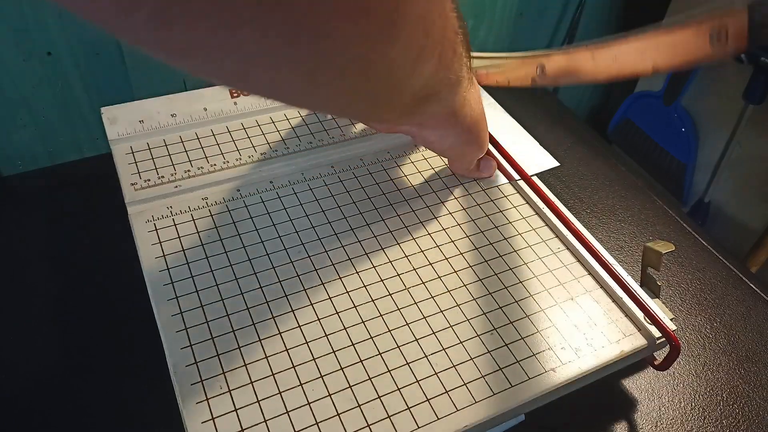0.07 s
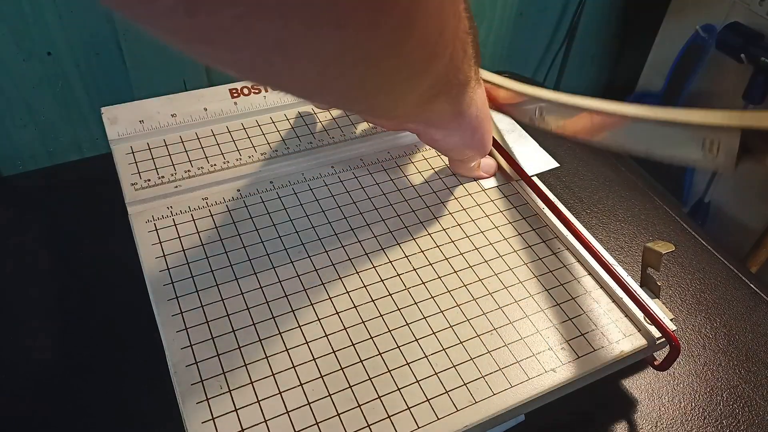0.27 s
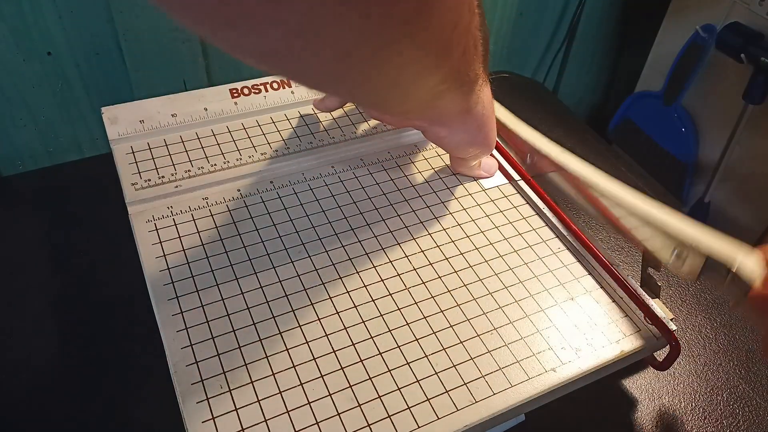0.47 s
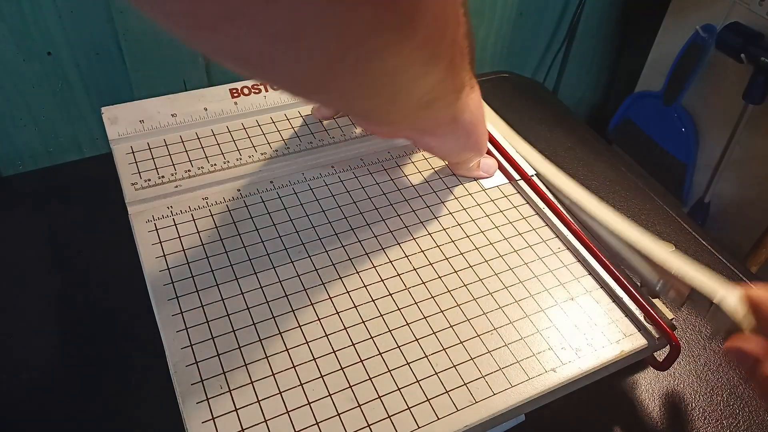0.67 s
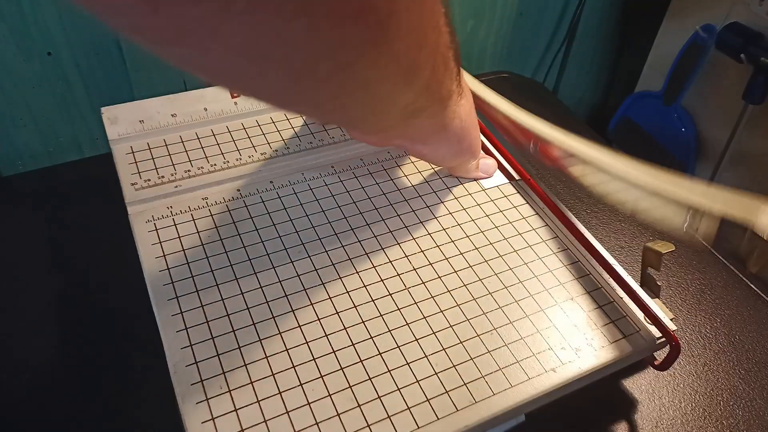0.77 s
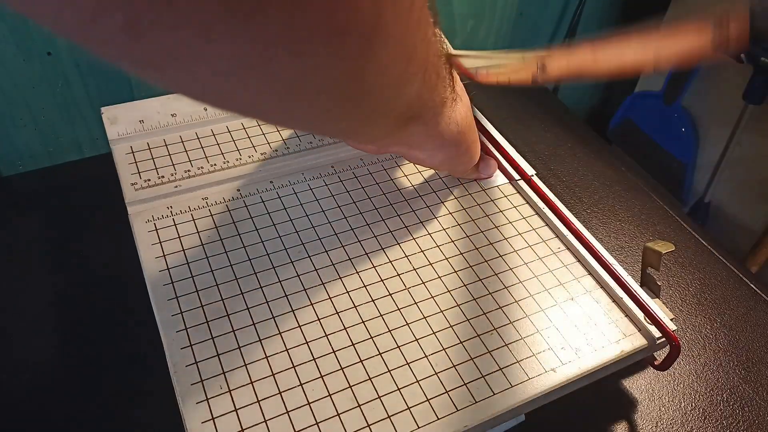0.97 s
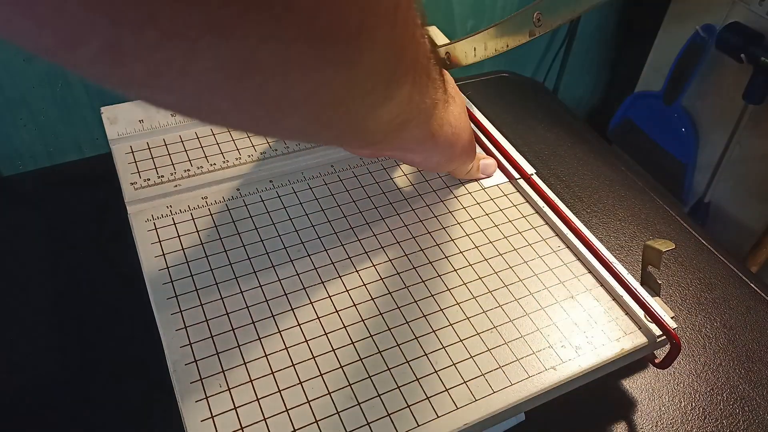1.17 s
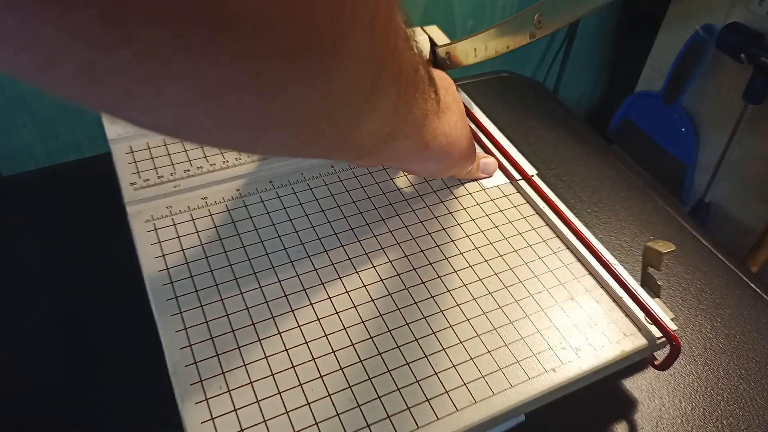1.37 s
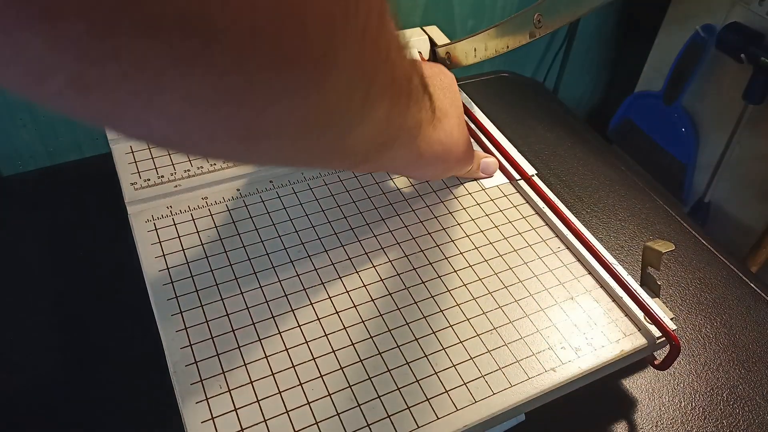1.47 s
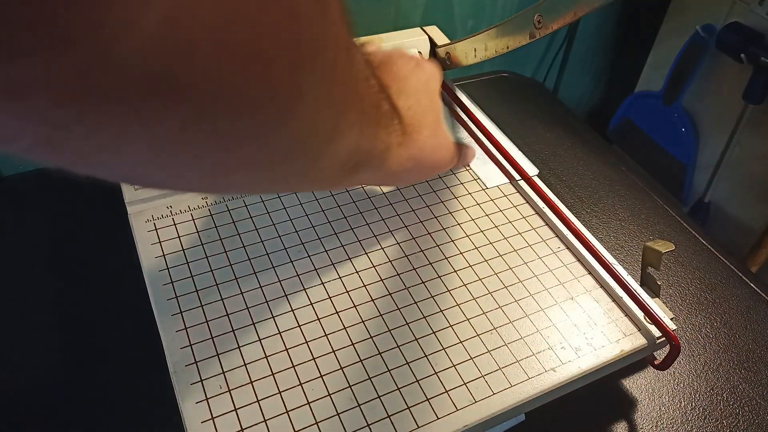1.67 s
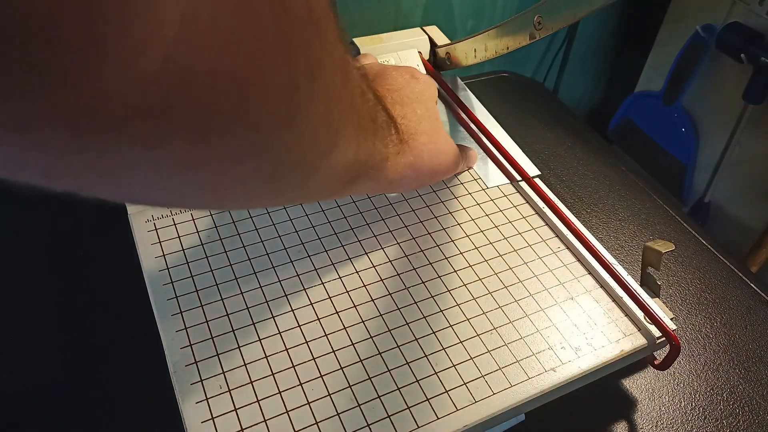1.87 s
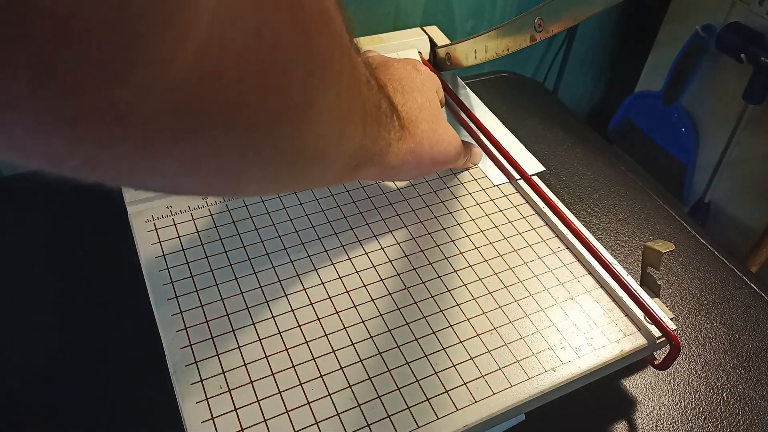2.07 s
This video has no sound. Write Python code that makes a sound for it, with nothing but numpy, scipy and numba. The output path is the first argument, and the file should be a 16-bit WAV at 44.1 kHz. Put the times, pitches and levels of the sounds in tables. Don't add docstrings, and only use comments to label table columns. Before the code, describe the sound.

A lever paper cutter grinds loudly through thin metal sheet, scrapes back up and knocks at its stop

```python
import sys
import numpy as np
from scipy import signal
from scipy.fft import rfft, irfft
from scipy.io import wavfile
from scipy.ndimage import uniform_filter1d
from numba import njit

SR = 44100
rng = np.random.default_rng(int(sys.argv[2]) if len(sys.argv) > 2 else 0)


def pcm_store(signal):
    levels = np.round(np.clip(np.atleast_2d(signal), -1, 1) * 32767)
    wavfile.write(sys.argv[1], SR, levels.astype(np.int16).T)


def boost_factor(decibels):
    exponent = np.asarray(decibels, float) / 20
    return 10 ** exponent


N = 92610

# [f/Hz, level/dB, t60/s]
BOARD = [(93.487, -8.5, 0.53), (132.82, -13, 0.7), (147.18, -1, 0.4061), (199.38, -2.5, 0.11),
         (226.77, 1.5, 0.16472), (275.29, -12.5, 0.14)]
ARM = [(444, 0.5, 0.3329, 8, 0.1732), (482.5, -4.5, 0.2763, -4.5, 0.3557),
       (556.5, -5, 0.3278, -0.5, 1.1367), (677, -13, 0.1983, -1.5, 0.5666),
       (874.5, -9.5, 0.0356, -15.5, 2.5), (880, -17, 0.074), (1295, -9, 0.11), (1440, -15, 0.088),
       (1610, -4.9, 0.057), (2013, -0.57, 0.022), (2200, -7.5, 0.08), (4100, -6, 0.11)]
AIR_HZ = 11854
PATCHY_DB = 3.5
SIDES = np.array([[1], [-1]])


def level(x, db=0):
    return x * boost_factor(db) / np.sqrt(np.mean(x ** 2))


@njit
def svf(x, hz, k):
    y, b, l = np.empty(len(x)), 0., 0.
    for i in range(len(x)):
        g = np.tan(np.pi * hz[i] / SR)
        v = (b + g * (x[i] - l)) / (1 + g * (g + k))
        b, l, y[i] = 2 * v - b, l + 2 * g * v, k * v
    return y


def band(x, hz, width_hz):
    return svf(x, np.full(len(x), 1. * hz), width_hz / hz)


def twice(x, hz, width_hz, hz2, width2_hz):
    return band(band(x, hz, width_hz), hz2, width2_hz)


def ring(x, modes):
    out = 0
    for k, (hz, db, t60, *place) in enumerate(modes):
        usual = (-.6, .12) if hz < 400 else (0, 1.625 * (-1) ** k)
        pan_db, lead = place or usual
        r = np.exp(-np.log(1000) / (t60 * SR))
        pole = r * np.exp(2j * np.pi * hz / SR)
        z = signal.lfilter([np.sqrt(2 * (1 - r * r))], [1, -pole], x) * boost_factor(db)
        out = out + np.array([(z * np.exp(.5j * s * lead)).imag * boost_factor(s * pan_db / 2) for s in (1, -1)])
    return out


def total_gain(modes):
    return np.sqrt(np.sum(boost_factor([m[1] for m in modes]) ** 2))


def walk(rate):
    k = int(SR / rate)
    steps = np.repeat(rng.standard_normal(N // k + 1), k)
    return 1.743 * uniform_filter1d(uniform_filter1d(steps, k), k)[:N]


def grit():
    slips_per_s, spread_db = 14000, 2.0
    chance, size = rng.random((2, N))
    slips = (chance < slips_per_s / SR) * boost_factor(-spread_db * np.log(size + 1e-9))
    return level(slips * rng.standard_normal(N) + 0.05 * rng.standard_normal(N))


def hump(t, start, length, rise, fall):
    return np.clip((t - start) / rise, 0, 1) * np.exp(-np.maximum(t - start - length, 0) / fall)


def spread(mid, side):
    return mid + .6 * side * SIDES


def shop():
    # [f/Hz, level/dB]
    spectrum = [(60, -12), (240, -9.5), (400, -25), (3500, -32), (7000, -31.5), (11000, -51.5)]
    hz, db = np.transpose(spectrum)
    f = np.arange(N // 2 + 1) * SR / N + 1
    gain = boost_factor(np.interp(np.log(f), np.log(hz), db))
    x = irfft(rfft(rng.standard_normal((2, N))) * gain, N)
    return level(x + 0.7 * x[::-1], -69.5) * boost_factor(2.0 * walk(9.6))


def strokes(t):
    # [t/s, load on the board/dB, chatter/dB, chatter f/Hz, edge scrape/dB]
    down = [
        (0.134, -93, -58.5, 1570, -58.5),
        (0.17, -35, -40, 1132, -49),
        (0.223, -30, -37.5, 1281, -47.5),
        (0.349, -28, -31, 1270, -41.5),
        (0.449, -22, -26.5, 1074, -35.5),
        (.585, -20.5, -18, 1072, -31.5),
        (0.649, -21, -28.5, 905.4, -27),
        (0.749, -29.5, -42, 850, -28.5),
        (0.806, -50, -37, 1254, -33),
    ]
    up = [
        (0.83, -34.5, -25, 3257, -28.5),
        (0.867, -37, -24.5, 2467, -27),
        (0.894, -28, -22, 1402, -31.5),
        (0.931, -31, -25, 1204, -29),
        (1.04, -32.5, -27.5, 1600, -33.5),
        (1.121, -30.5, -31.5, 1379, -28.5),
        (1.143, -24.5, -44, 799.9, -34.5),
        (1.167, -29, -47, 980, -30.5),
        (1.201, -36.5, -40.5, 1183, -37),
    ]
    # [t/s, level/dB, length/s]
    catches = [
        (0.143, -46, 0.0107),
        (0.628, -19.5, 0.0055),
        (0.676, -33, 0.024),
        (1.129, -34, 0.0039),
        (1.183, -26.5, 0.0087),
    ]
    when, load_db, chatter_db, chatter_hz, scrape_db = np.array(down + up).T
    release = np.exp(-np.maximum(t - when[-1], 0) / .006)
    judder = boost_factor(1.5 * walk(45))
    on = release * judder * np.clip(t / when[0], 0, 1) ** 2
    load, chatter, push = [boost_factor(np.interp(t, when, db)) * on for db in (load_db, chatter_db, scrape_db)]
    for start, db, length in catches:
        push = push + boost_factor(db) * hump(t, start, length, 0.0017, 0.0011)
    pitch = np.exp(np.interp(t, when, np.log(chatter_hz)))
    return load, chatter, pitch, push


def board_groan(t, load):
    # [t/s, favoured f/Hz]
    bearing = [
        (.2, 213),
        (.45, 159),
        (.62, 182.2),
        (.72, 92.9),
        (.82, 230),
        (1.2, 210),
    ]
    hz = np.interp(t, *np.transpose(bearing))
    shake = svf(svf(grit(), hz, 1.7), hz, 1.7) * load
    pressed = .45
    return ring(shake, [(hz, db, pressed * t60) for hz, db, t60 in BOARD]) / total_gain(BOARD)


def arm_chatter(force, pitch):
    wide = 0.69916
    slips = grit()
    narrow = svf(svf(slips, pitch, wide), pitch, wide)
    rough = np.array([twice(grit() * force, 1500, 2100, 1500, 2500) for _ in range(2)])
    arm = ring((narrow + boost_factor(-9) * slips) * force, ARM)
    return arm + boost_factor(4.5) * (rough + 0.4 * rough[::-1]) + boost_factor(2.5) * narrow * force


def edge_scrape(push):
    # [f/Hz, level/dB]
    edge_modes = [(3680, -9.5), (5320, 1), (5870, 3.5), (6360, 6), (6700, 4.5), (7050, 1), (7500, -2),
                  (8260, -13)]
    rub = grit() * push
    edge = 0
    for hz, db in edge_modes:
        bursts = boost_factor(3 * walk(39))
        edge = edge + ring(rub * bursts, [(hz, db, 0.014, .2, 1.2)])
    air_rise = 1.2
    bright = push * (push / boost_factor(-30)) ** (air_rise - 1) * boost_factor(PATCHY_DB * walk(25))
    mid, side = [twice(grit() * bright, AIR_HZ, 7000, AIR_HZ, 9000) for _ in range(2)]
    return edge / total_gain(edge_modes) + boost_factor(-30) * (mid + .4 * side * SIDES)


def sheet(x):
    # [f/Hz, level/dB]
    outline = [(700, -4.5), (2000, -6), (3500, -4), (6500, -4.5), (8000, -4), (10000, -16), (15800, -21)]
    outline_hz, outline_db = np.transpose(outline)
    low, high = outline_hz[0], outline_hz[-1]
    c = rng.random((48, 4))
    hz = low + (high - low) * ((np.arange(48) + c[:, 0]) / 48) ** 1.3
    db = np.interp(np.log(hz), np.log(outline_hz), outline_db) + 6 * c[:, 1] - 17
    t60 = np.full(48, 0.030643)
    pan_db = 3 * (c[:, 2] - .5)
    lead = 4 * 1.3491 * (c[:, 3] - .5) * np.minimum(4500 / hz, 1)
    modes = np.array([hz, db, t60, pan_db, lead]).T
    return sum(ring(x * boost_factor(PATCHY_DB * walk(21.685)), group) for group in modes.reshape(12, -1, 5))


def locks(t):
    # [t/s, length/s, level/dB, f/Hz, left-right/dB]
    lock_events = [(.21, 0.02914, -29, 230, 3.5), (0.211, 0.09967, -36, 440.6, 4),
                   (0.306, 0.08324, -37, 560, -0.5), (0.346, 0.09433, -32, 435, 5),
                   (0.366, 0.10003, -23, 150, -0.5), (0.403, 0.04718, -28, 240.6, 0),
                   (0.489, 0.0427, -18.5, 158, 0), (0.491, 0.03756, -21.5, 229.1, 0),
                   (0.552, 0.019, -22, 233.1, 0), (0.546, 0.08283, -25.5, 438.9, 5),
                   (0.598, 0.03231, -24, 189.6, -0.5), (0.653, .055, -26, 222, 1.5),
                   (0.712, 0.03432, -28, 140.3, 0), (0.729, 0.02497, -37.5, 677.4, -3),
                   (.815, 0.06138, -33.5, 230, 0.5), (.878, 0.01219, -26, 573, -1.5),
                   (.912, 0.04405, -18, 445, 7.5), (0.952, 0.0077, -15.5, 455, 5),
                   (0.971, 0.02103, -15, 440, 4), (1.01, 0.02412, -18.5, 448, 5.5),
                   (1.037, 0.022, -21.5, 482.4, 0.5), (1.092, 0.04378, -31, 558.9, -1),
                   (.95, .07, -26, 540.5, -2.5), (0.956, 0.04988, -27, 231.5, 1.5),
                   (1.053, 0.016, -21.5, 224.4, -1), (1.089, 0.05076, -28, 219, -1)]
    out = 0
    for start, length, db, hz, pan_db in lock_events:
        wobble = 1 + 0.025059 * walk(40)
        phase = 2 * np.pi * np.cumsum(hz * wobble) / SR
        size = np.sqrt(2) * boost_factor(db + 1.5 * walk(90)) * hump(t, start, length, .006, 0.012056)
        lead = .35 * hz / 900
        out = out + size * np.array([np.sin(phase + k * lead) * boost_factor(k * pan_db / 2) for k in (1, -1)])
    return out


def knocks(t):
    # [t/s, board/dB, arm/dB, crack/dB, contact/s]
    knock_events = [
        (0.214, -32, -22, -64.5, 0.002685),
        (1.224, -39, -22, -27, 0.00045805),
        (1.2286, -22.5, -18, -46.5, 0.0010332),
        (1.2369, -13.5, -68.5, -62.5, 0.000922),
        (1.274, -18, -11.5, -70.5, 0.0022237),
        (1.294, -16.5, -63.5, -83, 0.003994),
        (1.387, -39, -32, -44.5, 0.00075),
        (1.39, -7.5, -14.5, -27.5, 0.001969),
        (1.413, -24.5, -13.5, -32, 0.00231),
    ]
    board, arm, rattle, thud = np.zeros((4, N))
    for start, board_db, arm_db, crack_db, contact in knock_events:
        push = np.sin(np.pi * np.clip((t - start) / contact, 0, 1)) / (contact * SR)
        board += 25 * boost_factor(board_db) * push
        arm += 40 * boost_factor(arm_db) * push
        rattle += boost_factor(crack_db) * hump(t, start, 0, 0.0016, 0.08437 / np.log(1000))
        thud += boost_factor(crack_db + 9.5) * hump(t, start, 0, 0.00089, 0.0925 / np.log(1000))
    noise = np.array([twice(grit() * rattle, 3000, 6100, 2200, 9000)
                      + 3 * twice(grit() * thud, 700, 550, 700, 810) for _ in range(2)])
    held = 0.3575
    resting_arm = [(m[0], m[1], held * m[2]) for m in ARM[1:]]
    return ring(board + 0.39 * grit() * thud, BOARD) + ring(arm, resting_arm) + noise + .5 * noise[::-1]


def rubs(t, rows, attack):
    fall = 0.014
    out = np.zeros((2, N))
    for start, length, db, hz, width_hz in rows:
        i = slice(int(start * SR), int((start + length + 8 * fall) * SR))
        shape = (boost_factor(db + 1.3 * walk(120)) * hump(t, start, length, attack, fall))[i]
        wide = 1.3 * width_hz
        for k in range(2):
            noise = rng.standard_normal(len(shape))
            body = level(twice(noise, hz, wide, hz, wide))
            air = level(band(noise[::-1].copy(), AIR_HZ, 9100))
            out[k, i] += shape * (body + boost_factor(-9.5) * width_hz / 5000 * air)
    return out


def squeals(t):
    # [t/s, length/s, level/dB, centre f/Hz, width/Hz]
    squeal_events = [(0.558, 0.018, -24, 4381, 210), (0.71, 0.024, -23.5, 6890, 400),
                     (0.741, 0.035, -31.5, 6816, 290), (0.75, 0.016, -26.5, 3455, 390),
                     (1.4, 0.0053, -33, 5040, 300), (0.79, 0.025, -25.5, 885, 79),
                     (0.91, 0.11, -28, 2300, 250), (0.58, 0.011, -26.5, 4250, 250),
                     (.95, .015, -28, 2000, 200), (0.88, 0.044, -36, 2500, 69),
                     (.885, 0.033, -28.5, 1600, 210), (0.59, .05, -33.5, 1580, 140),
                     (0.44, 0.079, -34, 1600, 130), (0.5, 0.03, -31.5, 1950, 200),
                     (.385, .012, -33, 1300, 72.1), (0.52, 0.078, -27, 870, 120)]
    return boost_factor(-3) * spread(*rubs(t, squeal_events, 0.01))


def hand(t):
    # [t/s, length/s, level/dB, centre f/Hz, width/Hz]
    slides = [
        (1.333, 0.06138, -62.5, 4500, 5000),
        (1.506, 0.10718, -58, 6827, 6980),
        (1.762, .018, -58, 3000, 3996),
    ]
    scuffs = [(1.679, 0.0138, -74, 1466, 500), (1.683, 0.003, -70.5, 5000, 5000),
              (1.785, 0.009162, -47.5, 1459, 483), (1.781, 0.0014, -44.5, 5659, 4075),
              (1.794, 0.005696, -31, 5600, 5991), (1.796, 0.031, -49, 1305, 800),
              (1.808, 0.011, -36, 6326, 6024), (1.815, 0.0311, -57.5, 226, 150),
              (1.925, 0.036, -61.5, 5682, 5000), (1.976, .006, -53, 4459, 4010),
              (1.983, 0.010815, -44.5, 5176, 4060), (2.007, 0.006527, -49, 3221, 183),
              (2.008, 0.006, -50.5, 3995, 250.6), (1.987, 0.026044, -53.5, 5907, 3000),
              (2.063, 0.002883, -47, 1849, 997), (2.069, 0.02676, -57.5, 4584, 5000),
              (2.046, 0.04918, -63.5, 201.1, 120)]
    return rubs(t, scuffs, 0.0021) + rubs(t, slides, 0.032)


def room(near):
    lag = np.arange(SR // 2) / SR
    decay = boost_factor(-60 * lag / 0.146) * np.clip(lag / 0.0029, 0, 1)
    tail = rng.standard_normal((2, len(lag))) * decay
    tail = signal.lfilter(*signal.butter(1, [300, 5000], "band", fs=SR), tail)
    tail = tail / np.sqrt(np.sum(tail ** 2) / 2)
    return boost_factor(-13.5) * signal.fftconvolve(near.mean(0, keepdims=True), tail, axes=1)[:, :N]


def scene():
    t = np.arange(N) / SR
    load, chatter, pitch, push = strokes(t)
    cut = board_groan(t, load) + arm_chatter(chatter, pitch) + edge_scrape(push)
    mid, side = hand(t)
    steel = sheet(boost_factor(0.5) * grit() * push + boost_factor(-4) * mid)
    near = cut + steel + locks(t) + knocks(t) + squeals(t) + boost_factor(-3) * spread(mid, side)
    return near + room(near) + shop()


def low_pass(x):
    return signal.sosfilt(signal.butter(12, 15900, fs=SR, output="sos"), x)


def record(dry):
    # [t/s, gain/dB]
    gate_moves = [
        (1.652, -2),
        (1.664, -38.5),
        (1.691, -4.5),
        (1.77, 0.5),
        (1.785, -4),
    ]
    x = signal.sosfilt(signal.butter(3, 82.2, "high", fs=SR, output="sos"), dry)
    x = signal.sosfilt(signal.butter(1, 11023, fs=SR, output="sos"), x)
    low = signal.sosfiltfilt(signal.butter(2, 400, fs=SR, output="sos"), x)
    gate = boost_factor(np.interp(np.arange(N) / SR, *np.transpose(gate_moves)))
    x = np.tanh(x + (gate - 1) * low)
    x = signal.sosfilt(signal.ellip(10, .3, 70, 15800, fs=SR, output="sos"), x)
    return low_pass(x)


dry = scene()
out = record(dry)
pcm_store(out)
```